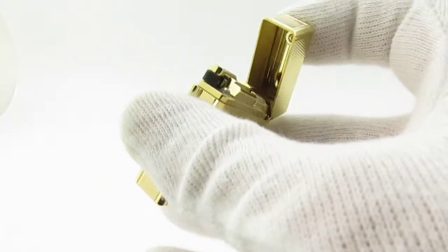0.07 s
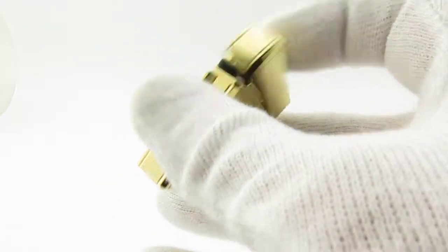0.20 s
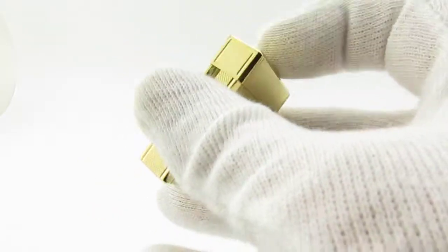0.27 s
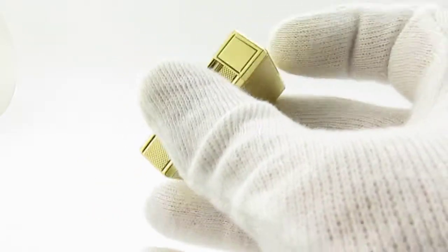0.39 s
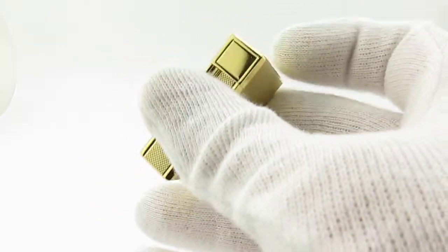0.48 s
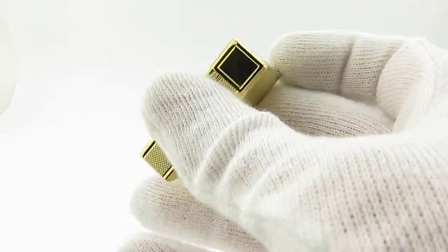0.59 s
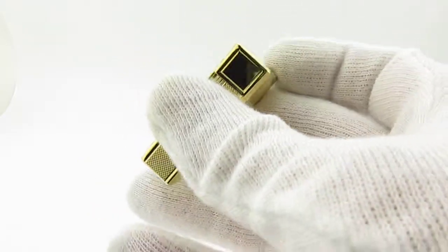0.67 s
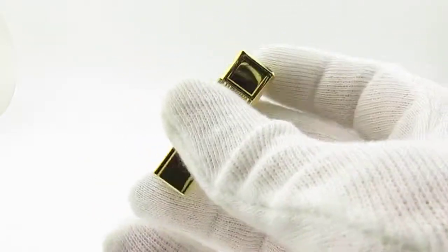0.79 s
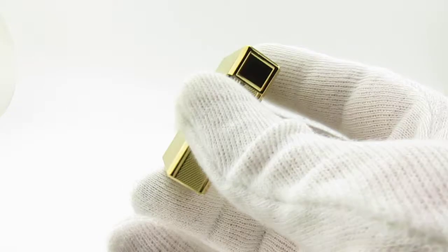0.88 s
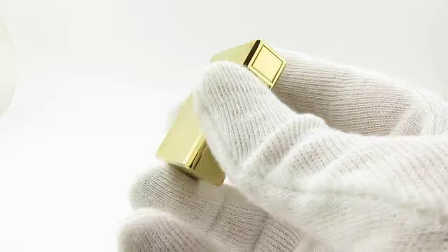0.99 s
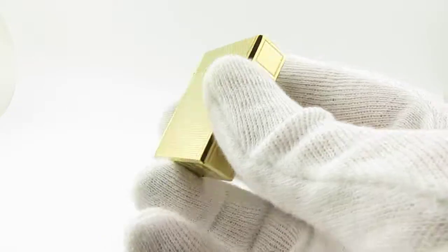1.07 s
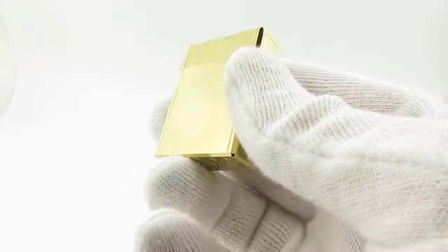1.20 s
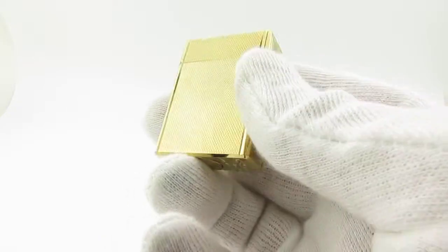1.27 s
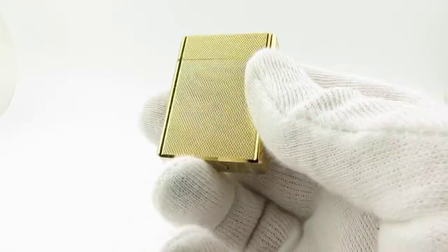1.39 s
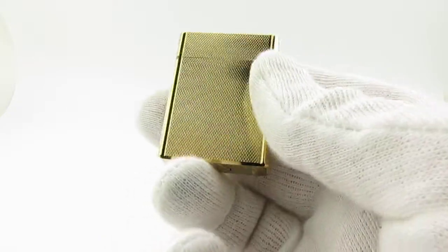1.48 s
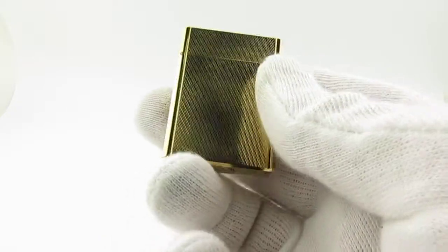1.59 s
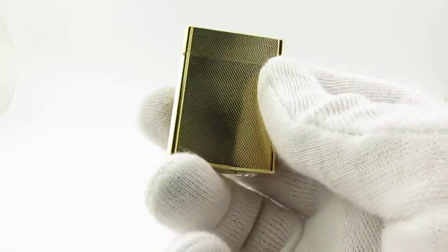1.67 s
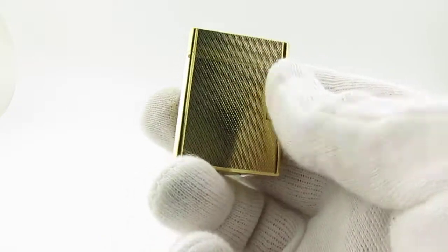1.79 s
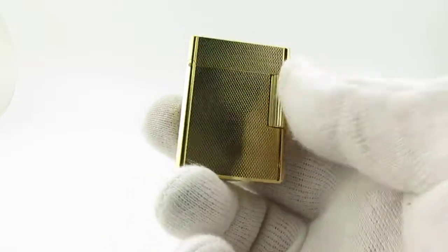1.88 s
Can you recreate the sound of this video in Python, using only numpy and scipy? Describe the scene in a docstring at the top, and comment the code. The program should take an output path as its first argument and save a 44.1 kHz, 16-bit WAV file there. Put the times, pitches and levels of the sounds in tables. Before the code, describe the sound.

One crisp, close snap of a metal lighter closing, ringing briefly in a quiet room.

```python
"""The lid of a metal gas lighter snaps shut once, close to the microphone, in a small quiet room.
A hard crack sets the case ringing, the lid chatters as it seats, and the room carries the ping on.
The snap overloads the recorder, whose gain control ducks the room noise and the rub of cotton
gloves, then creeps back."""
import sys
import numpy as np
from scipy import signal
from scipy.fft import rfft, irfft
from scipy.io import wavfile
from scipy.ndimage import uniform_filter1d

SR = 44100
rng = np.random.default_rng(int(sys.argv[2]) if len(sys.argv) > 2 else 0)


def digitize_waveform(pressure):
    """Quantize a signal to 16-bit integers and store it at the path in sys.argv[1].

    Rows of a 2-D input are taken as channels; values are limited to [-1, 1].
    """
    field = np.atleast_2d(pressure).T
    bounded = np.clip(field, -1, 1)
    quanta = np.round(bounded * 32767).astype(np.int16)
    wavfile.write(sys.argv[1], SR, quanta)


N = 85995
TIME_S = np.arange(N) / SR
FREQ_HZ = np.maximum(np.fft.rfftfreq(N, 1 / SR), 1)
SIDES = np.array([[1], [-1]])  # left, right


def undb(db):
    """Decibels to gain."""
    return 10 ** (np.asarray(db) / 20)


def unit(x):
    """Scale to rms 1."""
    return x / np.sqrt(np.mean(x ** 2))


def envelope(rows):
    """Gain over time from (s, dB) points."""
    return undb(np.interp(TIME_S, *np.array(rows).T))


def decay(t60_s):
    """Exponential fall, 60 dB in t60_s."""
    return np.exp(-np.log(1000) * TIME_S / t60_s)


def spectrum(rows):
    """Interpolate (Hz, value) points over log frequency."""
    hz, values = np.array(rows).T
    return np.interp(np.log(FREQ_HZ), np.log(hz), values)


def noise(colour):
    """Independent left and right noise with a (Hz, dB) colour, rms 1."""
    white = rfft(rng.standard_normal((2, N)))
    return unit(irfft(white * undb(spectrum(colour)), N))


def drift(rate_hz):
    """Smooth random motion up to about rate_hz, rms 1."""
    white = rfft(rng.standard_normal(N))
    return unit(irfft(white * np.exp(-(FREQ_HZ / rate_hz) ** 2), N))


def delay(x, seconds):
    """Start a stereo sound later."""
    return np.pad(x, ((0, 0), (round(seconds * SR), 0)))[:, :N]


# Room noise spectrum. Each row: frequency in Hz, relative density in dB.
AIR_COLOUR = [(15, -34), (25, -4.5), (49, 0), (156, -7), (209, -4), (246, -7.5), (410, -14.5),
              (1050, -19.5), (2350, -26), (3250, -26), (4740, -28.5), (9530, -29), (15500, -35)]

def background(air_db=-58, waver_db=1.5, hum_hz=222, hum_width_hz=14, hum_db=-69):
    """Low room noise with a faint wavering hum."""
    phase = 2 * np.pi * hum_hz * TIME_S
    hum = [drift(hum_width_hz) * np.sin(phase) + drift(hum_width_hz) * np.cos(phase) for _ in range(2)]
    air = noise(AIR_COLOUR) * undb(air_db + waver_db * drift(rate_hz=6))
    return air + undb(hum_db) * np.array(hum)


# Cotton rubbing on metal. Each row: time in seconds, level in dB.
RUB_LEVELS = [(0, -65), (.12, -63.5), (.2, -64), (.3, -79), (.66, -70), (.73, -62), (.82, -71),
              (1.13, -67.5), (1.33, -91.5), (1.54, -66), (1.7, -71.5), (1.85, -65), (1.95, -65)]
# Rub spectrum. Each row: frequency in Hz, relative density in dB.
RUB_COLOUR = [(300, -9.5), (2000, -6), (6500, -8), (9500, -1), (12500, -2), (15500, -7)]
# Rumble of the hand. Each row: time in seconds, level in dB.
RUMBLE_LEVELS = [(0, -53.5), (.18, -54), (.3, -67), (1.3, -69.5), (1.56, -60.5), (1.68, -65.5),
                 (1.95, -55.5)]
# Rumble spectrum. Each row: frequency in Hz, relative density in dB.
RUMBLE_COLOUR = [(20, -5), (42, 1.5), (110, -9), (280, -6.5), (450, -20), (1500, -29), (8000, -55)]

def gloves(grain_db=1):
    """Cotton fibres hiss over the metal; the hand rumbles softly as it turns the lighter."""
    rub = noise(RUB_COLOUR) * envelope(RUB_LEVELS)
    grain = unit(undb(grain_db * drift(rate_hz=150)))
    rumble = noise(RUMBLE_COLOUR) * envelope(RUMBLE_LEVELS)
    return rub * grain + rumble


# Reverberation bands. Each row: centre in Hz, relative level in dB, T60 in seconds.
ROOM_BANDS = [(150, -15, .25), (800, -3, 0.51), (1800, -3.5, 0.51), (4500, -5.5, 0.48), (8500, 0, .39),
              (12000, -1.5, 0.5), (15500, 2, 0.29)]

def room(x, gain_db=-22.5, build_s=.006):
    """A diffuse tail builds quickly and dies soonest in the bass and top treble."""
    centres_hz = [row[0] for row in ROOM_BANDS]
    white = rfft(rng.standard_normal((2, N)))
    tail = 0
    for centre_hz, db, t60_s in ROOM_BANDS:
        band = spectrum([(hz, hz == centre_hz) for hz in centres_hz])  # triangular weight
        tail += irfft(white * band, N) * undb(db) * decay(t60_s)
    tail *= 1 - np.exp(-TIME_S / build_s)
    return undb(gain_db) * signal.fftconvolve(x, unit(tail) / np.sqrt(N), axes=1)[:, :N]


# Knock modes. Each row: frequency in Hz, level in dB, T60 in seconds.
KNOCK_MODES = [(55, -21, .05), (150, -28, 0.014), (342, -10.5, .017)]

def knock():
    """The lighter knocks against the hand that holds it."""
    return sum(undb(db) * decay(t60_s) * np.cos(2 * np.pi * hz * TIME_S)
               for hz, db, t60_s in KNOCK_MODES)


# Spectrum of the small parts. Each row: frequency in Hz, relative density in dB.
JANGLE_COLOUR = [(200, -22.5), (900, -22.5), (2000, -11), (3800, -11.5), (5500, -5), (7600, -8), (9800, 5),
                 (12000, -3.5), (15000, -4.5)]

def jangle(level_db=6, t60_s=.05, width=.9):
    """Hinge and inner parts give a dense, short ring."""
    mid, side = noise(JANGLE_COLOUR)
    return unit(mid + width * side * SIDES) * decay(t60_s) * undb(level_db)


# Modes of case and lid. Each row: frequency in Hz, relative level in dB, T60 in seconds.
CASE_MODES = [(2010, -21.5, .07), (2963, -22.5, .035), (4569, -31.5, 0.47), (4690, -30, 0.33),
              (4610, -0.5, 0.035), (6210, -13, 0.058), (7055, -19.5, .03), (8470, -1.5, 0.054),
              (8550, -0.5, 0.055), (9260, -13, .04), (10200, -11.5, 0.076), (11510, -7.5, 0.058),
              (11700, -12.5, 0.027), (13700, -7.5, 0.084), (8520, -23.5, 0.2), (14580, 2.5, .022),
              (14450, 3.5, 0.05), (15080, -7, .035)]

def case_ring(gain_db=.5, stereo_rad=.25):
    """The struck metal rings in decaying modes, each slightly out of phase between channels."""
    ring = 0
    for hz, db, t60_s in CASE_MODES:
        phase = rng.uniform(0, 2 * np.pi) + SIDES * stereo_rad * rng.choice([-1, 1])
        ring += undb(db + gain_db) * decay(t60_s) * np.sin(2 * np.pi * hz * TIME_S + phase)
    return ring


# Crack spectrum. Each row: frequency in Hz, relative density in dB.
CRACK_COLOUR = [(60, -15), (360, -10), (750, -21), (1300, -1.5), (1700, -8.5), (2500, 0), (3800, -3.5),
                (5500, 3), (7500, -3.5), (11000, 2.5), (15000, 1.5)]

def crack(onset_s, gain_db=29.5, spread_s=.0008, left_lag_s=15e-6, length_s=.02):
    """One sharp pulse, smeared as the metal delays each frequency a little differently."""
    knots_hz = np.linspace(0, SR / 2, num=24)
    group_delay_s = onset_s + np.interp(FREQ_HZ, knots_hz, rng.uniform(0, spread_s, len(knots_hz)))
    cycles = np.cumsum(group_delay_s) * SR / N + FREQ_HZ * np.array([[left_lag_s], [0]])
    magnitude = undb(gain_db + spectrum(CRACK_COLOUR))
    return irfft(magnitude * np.exp(-2j * np.pi * cycles), N) * (TIME_S < length_s)


# Balance of the direct snap. Each row: frequency in Hz, left minus right in dB.
SNAP_BALANCE = [(60, -7), (110, -8.5), (200, -7.5), (380, -3.5), (700, 2.5), (1290, -2.5), (2380, -1),
                (4400, -3.0), (8120, 4), (15000, 1.5)]

def directivity(x):
    """The case radiates each frequency a little more to one side."""
    return irfft(rfft(x) * undb(SIDES * spectrum(SNAP_BALANCE) / 2), N)


# Lid contacts. Each row: start in seconds after first touch, crack gain in dB.
LID_CONTACTS = [(0, 3), (.0033, -20.5)]

def lid_snap(onset_s=.0005, ring_rise_s=.00015):
    """Each contact cracks; the first, at full force after onset_s, knocks and rings the lighter."""
    pulse = crack(onset_s)
    cracks = sum(undb(db) * delay(pulse, start_s) for start_s, db in LID_CONTACTS)
    ringing = (case_ring() + jangle()) * (1 - np.exp(-TIME_S / ring_rise_s))
    return cracks + delay(ringing + knock(), onset_s)


def scene():
    """The snap and its reverberation over quiet handling and room noise."""
    snap = delay(lid_snap(), seconds=.2076)
    return directivity(snap) + room(snap) + gloves() + background()


def record(dry):
    """Gain control looks just ahead, drops fast and recovers slowly; peaks clip; the top is cut."""
    threshold_db, recovery_db_per_s, cutoff_hz = -4.5, 17, 15520
    detect_s, look_ahead_s, attack_s = .0018, .0011, .00073
    window = int(detect_s * SR)
    power = uniform_filter1d(np.mean(dry ** 2, axis=0), window, origin=(window - 1) // 2)
    over_db = np.maximum(10 * np.log10(np.maximum(power, 1e-12)) - threshold_db, 0)
    recovery_db = recovery_db_per_s * TIME_S
    duck_db = np.maximum.accumulate(over_db + recovery_db) - recovery_db
    duck_db = np.interp(TIME_S + look_ahead_s, TIME_S, duck_db)
    pole = np.exp(-1 / (attack_s * SR))
    duck_db = signal.lfilter([1 - pole], [1, -pole], duck_db)
    clipped = np.clip(dry * undb(-duck_db), -1, 1)
    lowpass = signal.ellip(10, .2, 60, cutoff_hz, fs=SR, output="sos")
    return signal.sosfilt(lowpass, clipped)


dry = scene()
out = record(dry)
digitize_waveform(out)
```